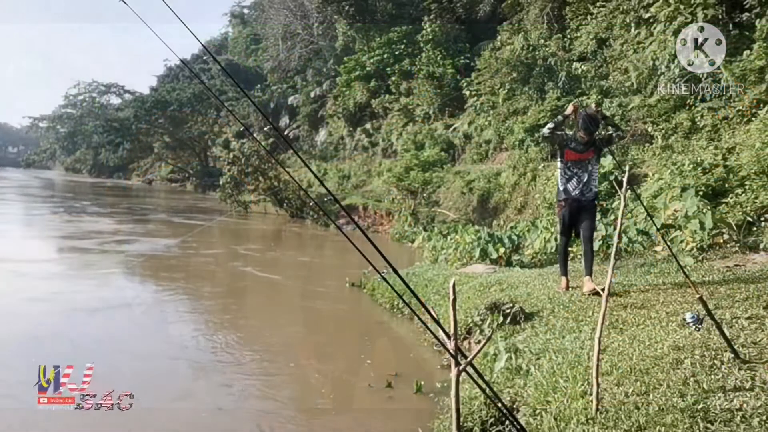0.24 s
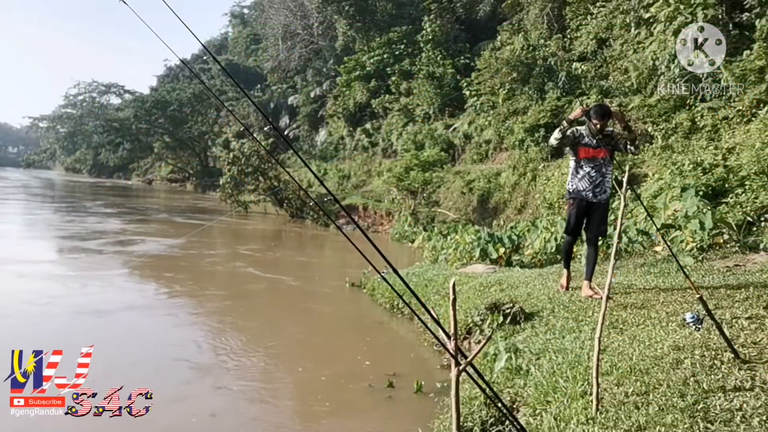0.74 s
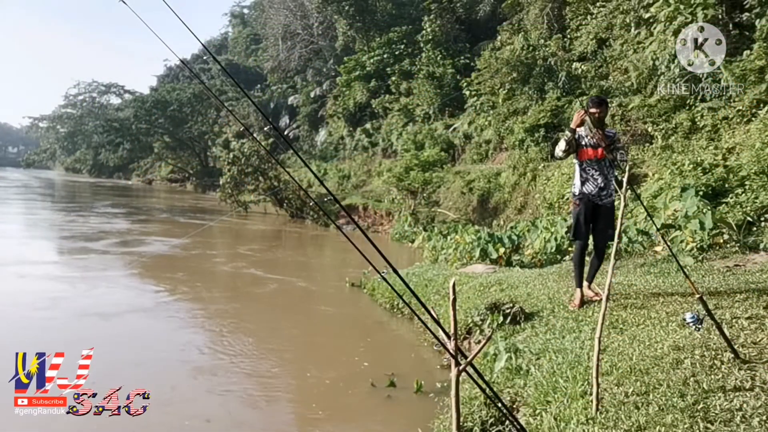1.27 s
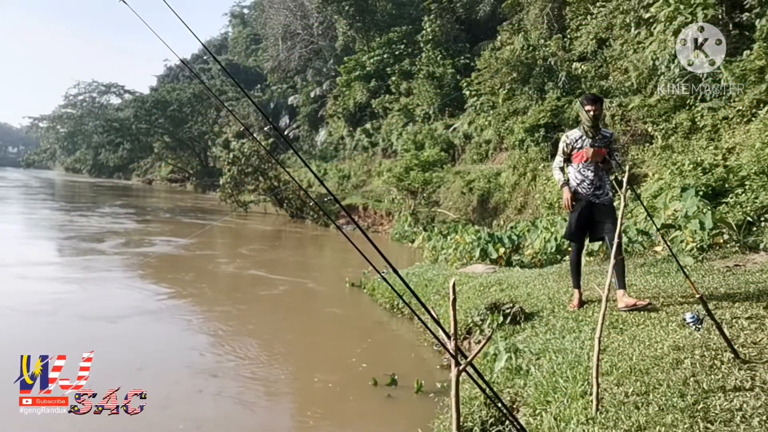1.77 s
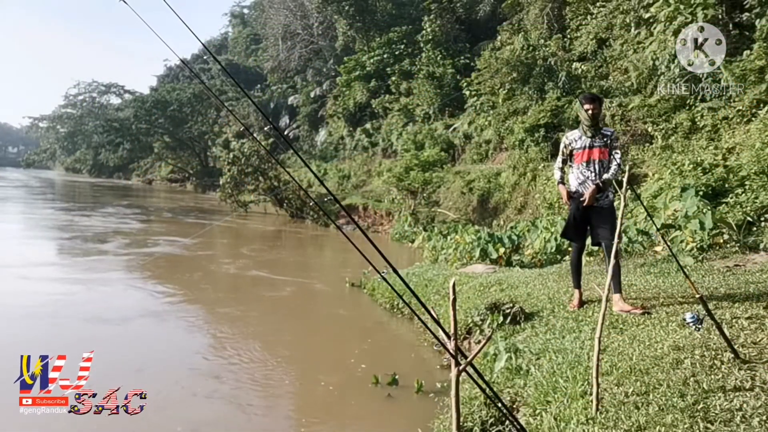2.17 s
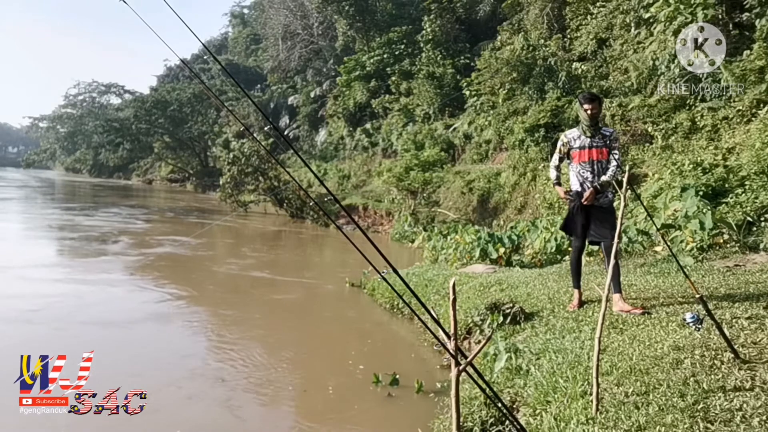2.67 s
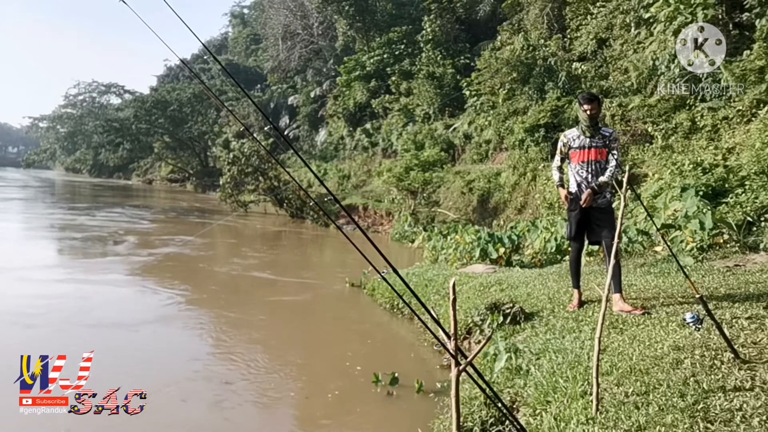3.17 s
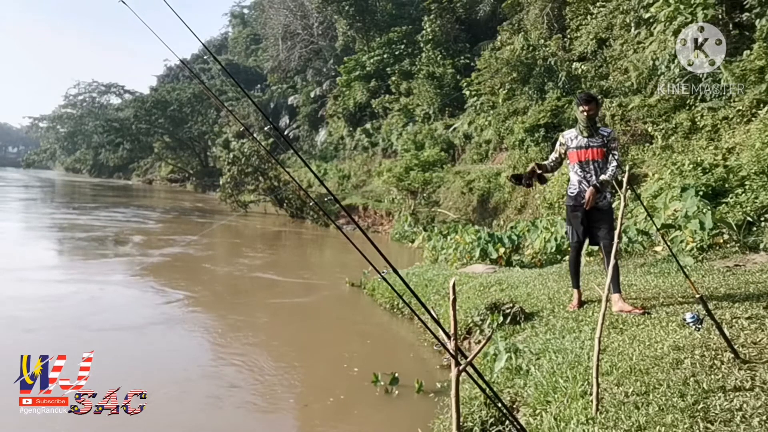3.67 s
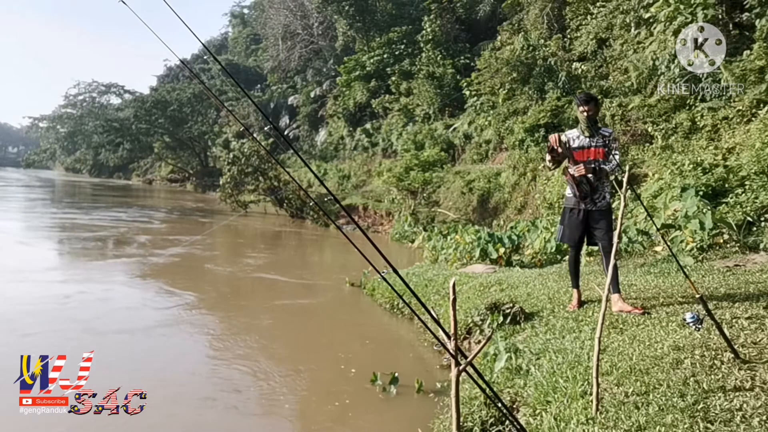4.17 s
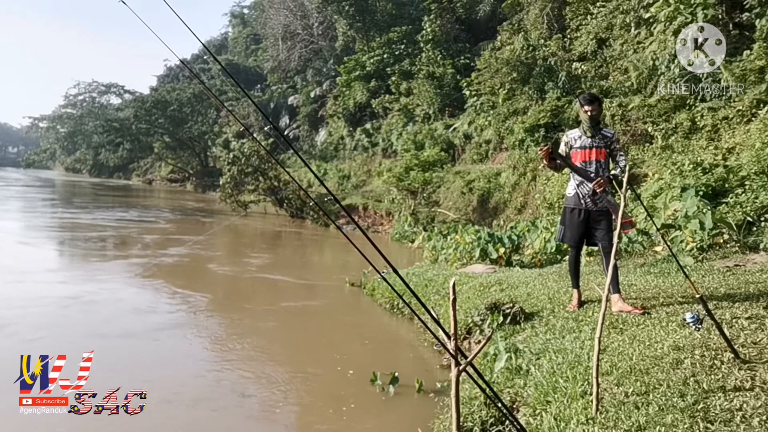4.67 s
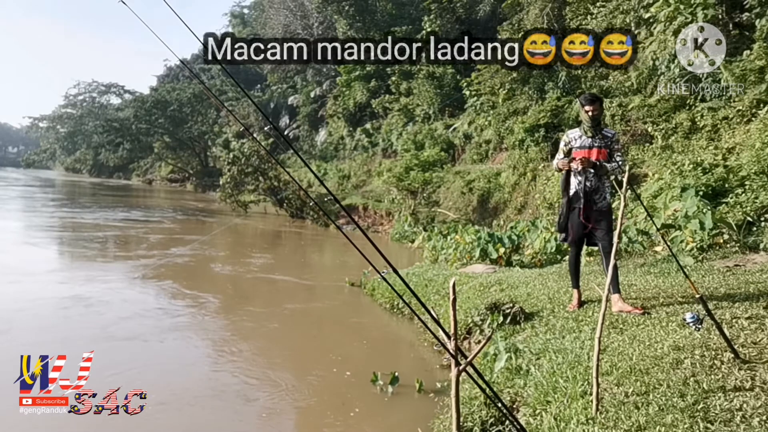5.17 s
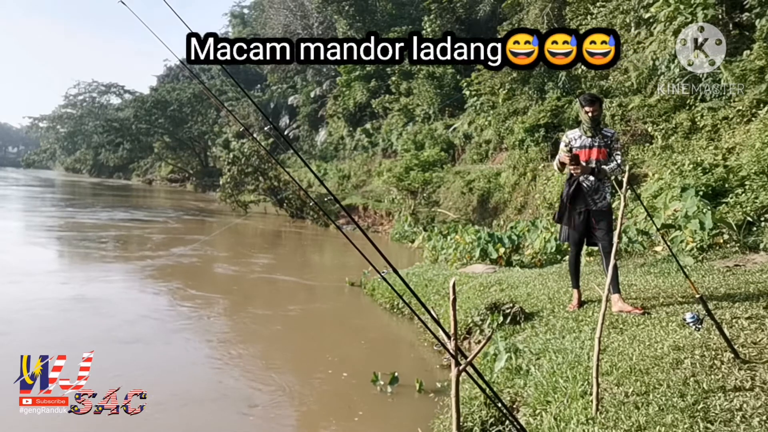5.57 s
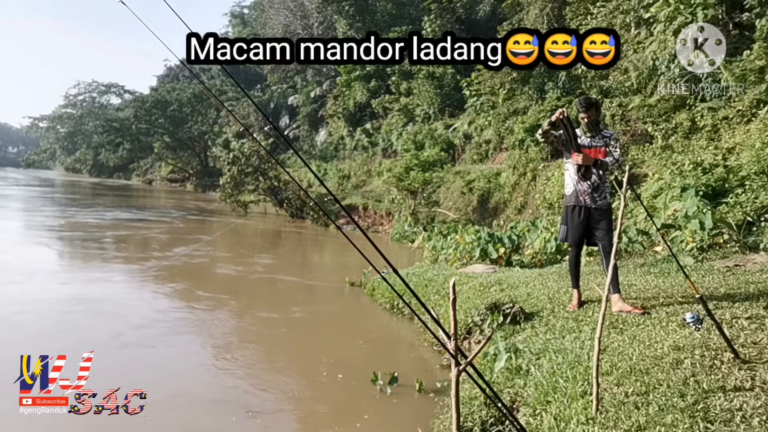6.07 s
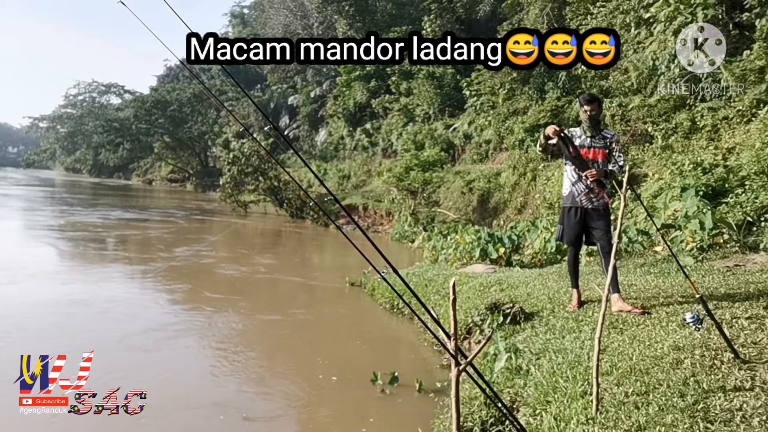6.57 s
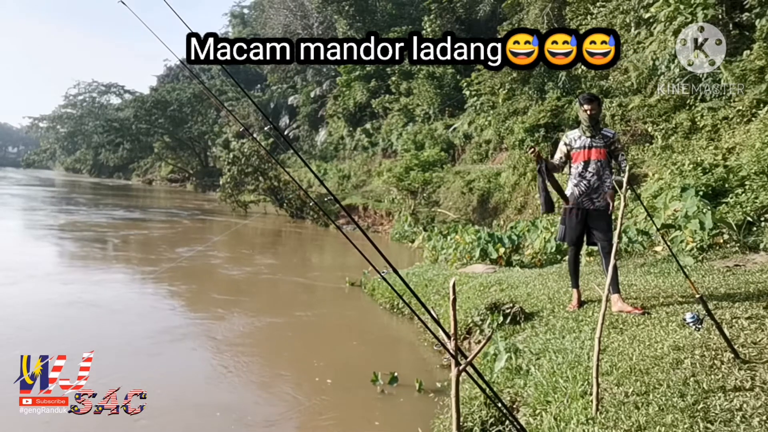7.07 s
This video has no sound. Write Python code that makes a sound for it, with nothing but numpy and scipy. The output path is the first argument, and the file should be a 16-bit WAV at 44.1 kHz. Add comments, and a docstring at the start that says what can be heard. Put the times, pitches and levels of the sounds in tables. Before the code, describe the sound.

From 0 to 7.3 s, a dense cicada chorus drones around 6 to 9 kHz, bright and flickering, starting softer and rising over the first 0.6 s, stronger on the right. Crisp cricket ticks recur roughly four times per second, with occasional gaps, alongside raspy high chirps, a wavering purr near 4.6 kHz and short rising trills about once a second. Lower answering chirps appear between 1.3 and 2.8 s. Underneath lie even river wash with a slight swell near 1.3 s, low air rumble and a distant unsteady engine, booming most from 2.6 to 5 s. Faint rustles and a hollow drone pass; a tiny snap falls at 2.1 s. Far soft hoots cluster from 1.2 to 3.2 s, then become rare. Hoarse, falling bird chips run from 2.7 to 3.5 s and from 6.6 to 7.2 s, lightly echoed by bank and trees.

```python
"""A cicada chorus drones high in the trees of a wooded bank: shaped noise, ringing singers and one clicking tymbal.
Crickets tick, chirp, trill and purr: noise resonances or gliding sines, shaped by wing strokes.
Below runs a muddy river of coloured noise; a far engine of wavering speed is a sum of its low orders.
A faint hollow drone, rustles and a thin whine lie between; one bird hoots far off, another gives two runs of chips.
The cicadas, most crickets and the even wash of the water start softer and rise over the first 0.6 s."""
import sys
import numpy as np
from scipy import signal
from scipy.fft import rfft, irfft, next_fast_len
from scipy.io import wavfile

SR = 44100
rng = np.random.default_rng(int(sys.argv[2]) if len(sys.argv) > 2 else 0)


def transcribe(signal):
    """Save signal, clipped to [-1, 1], as a 16-bit WAV file at the path in sys.argv[1]."""
    frames = np.atleast_2d(signal).T
    limited = np.clip(frames, -1, 1)
    pcm = np.round(limited * 32767).astype(np.int16)
    wavfile.write(sys.argv[1], SR, pcm)


N = 322812
TIME = np.arange(N) / SR

# Table levels stand before the gains in the functions; spectra are relative.
# Opening rise, held at its end. Each row: time in seconds, gain in dB.
FADE_IN = [(0, -15), (.2, -14.5), (.4, -11.5), (.6, -9.5)]

# Cicada chorus spectrum. Each row: frequency in Hz, left density in dB per Hz, right density in dB per Hz.
CHORUS_SPECTRUM = [(5480, -38, -29), (5624, -26.5, -20), (5937, -9.5, -10), (6030, -4.5, -14),
                   (6280, -3.5, -0.5), (7030, -2.5, 0.5), (7810, -1.5, -4), (8020, -7, -24), (8600, -9, -9),
                   (8810, -10.5, -24), (9170, -14.5, -20), (10950, -27.5, -26.5), (10900, -82, -78.5),
                   (13200, -34, -25), (15000, -44, -42)]
# Steady cicadas. Each row: pitch in Hz, width in Hz, level in dB, left minus right in dB.
STEADY_CICADAS = [(6560, 30, -79, 16), (7800, 170, -62.5, 4), (7864, 120, -53.5, -11.5),
                  (8030, 120, -67.5, -32)]
# Far cicada phrases. Each row: middle in seconds, length in seconds, pitch in Hz, level in dB,
# left minus right in dB.
CICADA_PHRASES = [(.52,0.65,6430,-69,-12),(1.52,0.51,6300,-61,-14),(2.55,.6,6300,-69,-9),(3.6,.6,6500,-62,-22),(4.65,0.49,6600,-64,-16),(5.678,0.66,6280,-63,-22),(6.652,0.7,6350,-65,-19),(1.05,1.1,8950,-65,-1),(3.95,1.1,8800,-86,8),(7,1.3,8950,-65,6)]

# Air rumble spectrum. Each row: frequency in Hz, density in dB per Hz.
RUMBLE_SPECTRUM = [(20, -23), (45, -3.5), (65, -14), (100, 0.5), (140, -1.5), (200, -14.5), (280, -21.5),
                   (450, -35.5)]
# Air rumble strength. Each row: time in seconds, level in dB.
RUMBLE_LEVELS = [(0, -62.5), (.42, -57.5), (.6, -55), (1.3, -52.5), (2.2, -53), (2.8, -56), (4.4, -54.5),
                 (5.5, -56.5), (6.2, -54.5), (7.32, -57)]
# Even river wash. Each row: frequency in Hz, density in dB per Hz.
WASH_SPECTRUM = [(150, -7), (300, 1.5), (500, -1), (800, -3.5), (1300, -5), (2500, -4.5), (3700, -5),
                 (5500, -6), (10000, -32), (15000, -33)]
# Water swells. Each row: time in seconds, level in dB.
SWELL_LEVELS = [(0, -75.5), (.7, -70.5), (1.1, -70.5), (1.25, -66), (1.62, -70), (1.85, -68.5),
                (2.5, -69.5), (3.0, -70.5), (5.3, -71.5), (6.3, -70), (7.32, -72.5)]
# Colour of the swells. Each row: frequency in Hz, density in dB per Hz.
SWELL_SPECTRUM = [(200, -7.5), (400, -4), (550, -4), (800, -7), (1300, -9), (2200, -9.5), (4000, -19)]

# Engine speed. Each row: time in seconds, rate in firings per second.
ENGINE_RATE = [(0, 43.5), (.24, 40.9), (.49, 43), (.85, 43), (1.1, 44.3), (1.24, 44.8), (1.37, 47.5),
               (1.77, 40.1), (1.98, 45), (2.2, 41.5), (2.44, 41.5), (2.63, 38.4), (2.91, 41), (3.3, 39.8),
               (3.65, 42.2), (3.83, 38.8), (4.04, 41.9), (4.36, 36.7), (4.59, 41), (4.89, 42.1),
               (5.12, 39.4), (5.32, 41.2), (5.57, 40.5), (5.91, 42.7), (6.14, 41.6), (6.34, 41.9),
               (6.46, 40.3), (6.81, 38.8), (7.16, 42), (7.32, 41)]
# Engine orders between surges. Each row: time in seconds, then levels of orders 2, 3, 4 and 5 in dB.
ENGINE_ORDERS = [(0, -59, -58, -70, -80), (.14, -66, -63, -72, -82), (.28, -66, -53, -68, -80),
                 (.44, -56, -59, -68, -76), (.5, -59, -45.3, -65, -68), (1.05, -49, -45, -66, -66),
                 (1.38, -49, -50, -70, -76), (1.55, -58, -51, -65, -74), (2.05, -54, -52, -64, -70),
                 (2.3, -52, -51, -64, -75), (2.6, -60, -51, -61, -76), (2.85, -52, -56, -54.5, -68),
                 (3.35, -48.5, -53, -52.5, -67), (3.6, -52.5, -55.5, -58, -72), (3.87, -52, -52, -54, -69),
                 (4.05, -50.5, -49, -59, -68), (4.2, -60, -56, -62, -74), (4.55, -53, -56, -56, -70),
                 (4.9, -54.5, -56, -60, -69), (5.1, -58, -54, -59, -70), (5.35, -51, -54, -65, -74),
                 (5.85, -51.5, -47, -59, -70), (6.3, -50, -47.5, -63, -75), (6.5, -56, -56, -55.5, -66),
                 (6.85, -52, -55, -58, -74), (7.1, -53, -49, -61, -68), (7.32, -50, -50, -63, -74)]
# Weak engine orders. Each row: multiple of the firing rate, level relative to order 4 in dB.
WEAK_ENGINE_ORDERS = [(1, -18.5), (6, -22.5)]
# Exhaust booms on order 3. Each row: middle in seconds, length in seconds, level in dB.
EXHAUST_SURGES = [(1.79, 0.16, -49.5), (1.977, 0.26, -61), (2.662, 0.25, -42), (2.818, 0.27, -41.5),
                  (3.176, 0.23, -39.5), (3.336, 0.21, -44), (3.64, .11, -45), (3.842, 0.17, -42),
                  (4.381, 0.35, -40), (4.916, 0.14, -43), (5.114, .22, -51)]

# Purring cricket. Each row: time in seconds, level in dB.
PURR_LEVELS = [(0, -80), (.5, -68.5), (.8, -68.5), (.92, -75), (1.7, -72.5), (2.0, -69), (2.4, -67),
               (2.9, -70.5), (3.2, -67.5), (3.7, -80), (4.7, -68), (5.7, -76.5), (6.65, -69), (7.32, -90)]
PURR_HZ, PURR_SCATTER_HZ, PURR_SPREAD_DB = 4657, 18, 1.6
PURR_STROKES_PER_S, PURR_STROKE_S, PURR_JITTER_S = 26, .024, .0045

# Insect whine. Each row: time in seconds, pitch in Hz, level in dB.
WHINE_TRACK = [(.1, 3070, -95), (.7, 3075, -85), (.9, 3072, -84), (1.25, 3060, -80), (1.7, 3060, -83),
               (1.95, 3055, -98), (3.3, 3000, -90), (3.8, 3000, -81), (4.3, 3020, -86), (4.8, 3042, -79),
               (5.05, 3050, -87), (5.9, 3020, -85), (6.4, 3030, -82), (7.3, 3040, -81)]
# Hollow drone. Each row: time in seconds, level in dB.
DRONE_LEVELS = [(1.0, -89), (1.3, -71), (2.0, -78), (2.4, -70.5), (3.2, -82), (3.7, -84.5), (5.8, -96),
                (6.3, -75), (6.6, -100)]
# Drone resonances. Each row: frequency in Hz, width in Hz, level in dB.
DRONE_MODES = [(375.5, 38, -1.5), (500, 160, -1)]

# High cricket runs. Each row: first chirp in seconds, last chirp in seconds, level in dB.
HIGH_CHIRP_RUNS = [(.03, .03, -57), (.43, .43, -56), (1.03, 1.25, -60), (1.49, 2.45, -57),
                   (2.69, 3.2, -56.5), (3.9, 4.13, -60.5), (4.37, 5.29, -56.5), (6.4, 6.63, -62),
                   (6.85, 7.29, -58.5)]
CHIRP_GAP_S, CHIRP_SPREAD_DB = .237, .7
# Nearest cricket ticks. Each row: middle in seconds, level in dB.
NEAR_TICKS = [(.13,-34),(0.55,-34),(.783,-35.5),(1.012,-37),(1.259,-38),(1.505,-34),(1.799,-36.5),(2.04,-35),(2.258,-36),(2.488,-39),(2.681,-34.5),(2.865,-35.5),(3.095,-33.5),(3.338,-33),(3.609,-39),(3.8,-34),(4.011,-36),(4.526,-44),(4.76,-34.5),(5.003,-37),(5.205,-36),(5.406,-33.5),(5.631,-34.5),(6.104,-39),(6.303,-35.5),(6.5,-36.5),(6.714,-34),(6.933,-36)]
TICK_HALF_LENGTH_S = .006  # falls to 1/e here
# Rustles and a snap. Each row: middle in seconds, length in seconds, centre in Hz, width in Hz, level in dB.
RUSTLE_EVENTS = [(.62, 0.49, 3730, 1800, -76.5), (1.27, 0.26, 1900, 1500, -74),
                 (1.302, 0.27, 700, 500, -73), (1.576, 0.29, 730, 380, -70.5),
                 (2.14, 0.027, 1400, 703, -65), (2.3, 0.17, 3800, 900, -77), (3.545, .08, 2680, 600, -72),
                 (4.764, 0.37, 3350, 2200, -72), (4.84, 0.14, 3460, 650, -67.5)]

# Short rapid trills. Each row: end in seconds, length in seconds, level in dB.
SHORT_TRILLS = [(0.922, .25, -70), (1.705, 0.24, -70), (2.436, 0.21, -67.5), (3.18, .19, -68),
                (4.0, .2, -70.5), (5.208, 0.45, -70.5), (6.31, 0.27, -68.5), (7.178, .28, -69)]
# Higher trills of another cricket. Each row: middle in seconds, length in seconds, pitch in Hz,
# rise in Hz per second, level in dB.
HIGHER_TRILLS = [(2.94, .11, 5320, 1400, -73), (4.14, .42, 5240, 803, -78.5)]
TRILL_STROKES_PER_S, TRILL_SHARPNESS, TRILL_SCATTER_HZ = 75, 1.5, 185
TRILL_HZ, TRILL_RISE_HZ_PER_S, TRILL_STOP_S = 5020, 800, 0.04  # pitch is that of the end

# Lower answering cricket. Each row: middle in seconds, level in dB.
ANSWERING_CHIRPS = [(1.33, -62), (1.5, -59), (1.66, -59), (1.86, -58), (2.07, -58.5), (2.29, -58.5),
                    (2.52, -57.5), (2.73, -57)]
# Far bird hoots. Each row: middle in seconds, length in seconds, pitch in Hz, level in dB.
FAR_HOOTS = [(1.18, 0.044, 454, -59), (1.394, 0.091, 416, -61), (1.57, 0.07, 405, -65),
             (1.785, 0.056, 392, -61), (1.868, 0.053, 395, -58), (1.965, 0.075, 395, -57.5),
             (2.145, 0.1, 392, -60), (2.384, 0.098, 392, -59), (2.61, 0.083, 396, -64),
             (2.862, 0.12, 387.6, -67.5), (2.972, 0.081, 376, -68), (3.191, 0.071, 390, -65.5),
             (4.361, 0.053, 403, -64.5), (5.975, 0.08, 431, -64)]
HOOT_SAG_HZ_PER_S = 83

# Bird chips. Each row: middle in seconds, level in dB, top pitch in Hz, lowest pitch in Hz,
# rise of the closing hook in Hz, gain of the hook in dB, length ratio.
BIRD_CHIPS = [(2.660, -59.5, 2650, 1850, 60, 2, 1), (2.932, -54, 2650, 2000, 60, -3, 1.15),
              (3.063, -50.5, 2860, 1880, 280, 1, .95), (3.183, -52, 2900, 1820, 480, -1, 1.1),
              (3.319, -51.5, 2800, 1880, 250, 0, .95), (3.447, -50, 2920, 1920, 400, -3, 1),
              (6.58, -57.5, 2750, 2000, 0, -4, 1.15), (6.910, -57.5, 2650, 1850, 100, 2, 1.2),
              (7.062, -52, 2620, 1880, 60, -1, .85), (7.205, -52, 2680, 1900, 100, -4, 1.1)]
# Shape of one chip. Each row: time from its middle in seconds, height from lowest to top pitch (0-1),
# share of the hook (0-1), gain in dB, hoarseness as a share of the pitch.
CHIP_CURVES = [(-.03, .6, 0, -30, .05), (-.019, .72, 0, -9, .07), (-.013, .85, 0, -1.5, .085),
               (-.008, .9, 0, 0, .07), (-.003, .66, 0, 1, .035), (.001, .46, 0, 3, .028),
               (.007, .16, 0, -4, .035), (.014, .04, 0, -3, .03), (.022, .05, .55, -5, .04),
               (.028, .05, 1, -9, .04), (.036, .05, 1, -32, .05)]
# Chip throat resonances. Each row: frequency in Hz, width in Hz, gain in dB.
THROAT_MODES = [(2330, 1300, 0), (2820, 70, -4)]
WARBLE_PER_S = 190
BANK_ECHO_S, BANK_ECHO_DB = .026, -7.5

CUTOFF_HZ = 15200


def from_db(db):
    """Decibels to gain."""
    return 10 ** (np.asarray(db) / 20)


def rms_one(x):
    """Scale to rms 1."""
    return x / np.sqrt(np.mean(x ** 2) + 1e-20)


def in_time(rows):
    """List of a table's columns, each interpolated at every sample."""
    s, *columns = np.transpose(rows)
    return [np.interp(TIME, s, column) for column in columns]


def drift(rate_hz):
    """Random wander of rms 1: noise through a double pole, computed every 40 samples."""
    step = 40
    pole = np.exp(-2 * np.pi * rate_hz * step / SR)
    noise = rng.standard_normal(N // step + 2002)
    slow = signal.lfilter([1], [1, -2 * pole, pole * pole], noise)[2000:]  # settled part
    return np.interp(np.arange(N) / step, np.arange(len(slow)), rms_one(slow))


def coloured(points, column=1):
    """Noise of rms 1 with the given spectrum, falling away past its ends."""
    table, size = np.array(points), next_fast_len(N)
    hz = np.maximum(np.fft.rfftfreq(size, 1 / SR), 1)
    gain = from_db(np.interp(np.log(hz), np.log(table[:, 0]), table[:, column]))
    gain *= np.minimum(1, np.minimum(hz / table[0, 0], table[-1, 0] / hz)) ** 2
    spectrum = rfft(rng.standard_normal(size)) * gain
    return rms_one(irfft(spectrum, size)[:N])


def band(x, hz, width_hz):
    """A resonance with steep skirts; gain 1 on top."""
    edges_hz = [hz - width_hz / 2, hz + width_hz / 2]
    sos = signal.butter(2, edges_hz, "band", fs=SR, output="sos")
    return signal.sosfilt(sos, x + 1e-18)


def resonate(x, hz, width_hz):
    """What rings in one resonance; rms 1."""
    return rms_one(band(x, hz, width_hz))


def narrow(hz, width_hz):
    """Many small impulses (noise) ringing in one resonance; rms 1."""
    return resonate(rng.standard_normal(N), hz, width_hz)


def cycles(hz):
    """Running phase of a moving frequency, in radians."""
    return 2 * np.pi * np.cumsum(hz * np.ones(N)) / SR


def bump(s, length_s):
    """A rounded swell of height 1 centred on s."""
    return np.maximum(1 - (2 * (TIME - s) / length_s) ** 2, 0)


def strokes(per_s, sharpness):
    """One rounded pulse per wing stroke; rms 1."""
    return rms_one(np.exp(sharpness * np.cos(cycles(per_s))))


def place(x, pan_db, lag_ms):
    """Stereo: the left side is louder by pan_db and earlier by lag_ms."""
    right = np.interp(TIME - lag_ms / 1000, TIME, x)
    return np.array([x * from_db(pan_db / 2), right * from_db(-pan_db / 2)])


def spread(points, alike, lag_ms):
    """Stereo noise; the power share alike on both sides reaches the left first."""
    shared = place(coloured(points), 0, lag_ms)
    separate = np.array([coloured(points), coloured(points)])
    return np.sqrt(alike) * shared + np.sqrt(1 - alike) * separate


def foliage(x, wet_db, t60_s):
    """Leaves and trunks scatter a dying cloud of small echoes, different on each side."""
    age = np.arange(SR) / SR
    cloud = rng.standard_normal((2, SR)) * from_db(-60 * age / t60_s) * (age > .006)
    cloud /= np.sqrt(np.sum(cloud ** 2, axis=1, keepdims=True))
    return x + from_db(wet_db) * signal.fftconvolve(x, cloud, axes=1)[:, :N]


def cicada_chorus():
    """Many cicadas merge into flickering shaped noise, with one nearer tree as a broad resonance."""
    flicker_db = 1.0 * drift(220) + 0.25 * drift(6.0)
    left = from_db(-42.5 + flicker_db) * coloured(CHORUS_SPECTRUM, column=1)
    right = from_db(-41.0 + flicker_db) * coloured(CHORUS_SPECTRUM, column=2)
    tree = from_db(-48.5 + flicker_db) * narrow(hz=7470, width_hz=800)
    return np.array([left, right]) + place(tree, pan_db=-10.5, lag_ms=0.397)


def steady_cicadas():
    """Single cicadas hold steady notes: noise in narrow resonances."""
    return sum(place(from_db(db) * narrow(hz, width_hz), pan_db, lag_ms=0.372)
               for hz, width_hz, db, pan_db in STEADY_CICADAS)


def clicking_cicada():
    """One near tymbal clicks at an almost even rate and rings a resonance."""
    clicks_per_s = 108 * (1 + 0.0045 * drift(3))
    clicks = np.diff(np.floor(cycles(clicks_per_s) / (2 * np.pi)), prepend=0)
    uneven = clicks * from_db(2.1 * drift(65))
    buzz = from_db(-55.0) * resonate(uneven, hz=7600, width_hz=190)
    return place(buzz, pan_db=-29.0, lag_ms=0.3886)


def air_rumble():
    """Low rumble of the air: noise of wandering level, mostly alike on both sides."""
    level = from_db(in_time(RUMBLE_LEVELS)[0] + 1.33 * drift(3.7))
    return level * spread(RUMBLE_SPECTRUM, alike=0.82, lag_ms=0.076) * from_db([[.6], [-.6]])


def river():
    """Water as an even wash and slow swells of coloured noise, mostly different on each side."""
    fade_db, = in_time(FADE_IN)
    swell_db, = in_time(SWELL_LEVELS)
    wash_level = from_db(fade_db - 63.0 + .5 * drift(8.2))
    wash = wash_level * spread(WASH_SPECTRUM, alike=0.2, lag_ms=0.14)
    swell_level = from_db(swell_db + 3.0 + 1.8 * drift(13.7))
    swells = swell_level * spread(SWELL_SPECTRUM, alike=0.35, lag_ms=0.24)
    return (wash + swells) * from_db([[.6], [-.6]])


def engine():
    """Only the low orders carry this far; the air makes each flutter, and the exhaust booms in every surge."""
    turn = cycles(in_time(ENGINE_RATE)[0])
    boom = sum(from_db(db) * bump(s, length_s) for s, length_s, db in EXHAUST_SURGES)
    second, third, fourth, fifth = from_db(in_time(ENGINE_ORDERS))
    orders = [(2, second, 0), (3, third, boom), (4, fourth, 0), (5, fifth, 0)]
    orders += [(round(k), fourth * from_db(db), 0) for k, db in WEAK_ENGINE_ORDERS]
    hum = np.zeros(N)
    for k, steady, extra in orders:
        level = steady * from_db(1.83 * drift(14.0)) + extra
        hum += level * np.sin(k * turn + rng.uniform(0, 2 * np.pi))
    return place(from_db(2.5) * hum, pan_db=1.3, lag_ms=0.5)


def purr_haze():
    """Purring crickets farther off blur into noise in one resonance."""
    sides = np.array([narrow(hz=4594, width_hz=470) for side in range(2)])
    return from_db(-65.5 + in_time(FADE_IN)[0]) * sides


def purring_cricket():
    """One cricket purrs in separate wing strokes, uneven in timing, pitch and level."""
    out, beats = np.zeros(N), np.arange(0, N / SR, 1 / PURR_STROKES_PER_S)
    scrape = cycles(90 * drift(260))
    for s, (late, sharp, loud) in zip(beats, rng.standard_normal((len(beats), 3))):
        start = s + PURR_JITTER_S * late
        near = slice(*np.searchsorted(TIME, [start, start + PURR_STROKE_S]))
        age = TIME[near] - start
        swell = from_db(PURR_SPREAD_DB * loud) * np.sin(np.pi * age / PURR_STROKE_S) ** 2
        pitch_hz = PURR_HZ + PURR_SCATTER_HZ * sharp
        out[near] += swell * np.sin(2 * np.pi * pitch_hz * age + scrape[near])
    level = from_db(in_time(PURR_LEVELS)[0] - 5.0)
    return foliage(place(level * rms_one(out), pan_db=-4.5, lag_ms=.41), wet_db=0, t60_s=0.083)


def whine():
    """A far insect's faint, rasping note: a sine of scattered pitch that comes and goes."""
    hz, db = in_time(WHINE_TRACK)
    scatter_hz = 60 * drift(130)
    level = from_db(db + 2.8 + 2.0 * drift(25))
    return place(level * np.sin(cycles(hz + scatter_hz)), pan_db=-10.5, lag_ms=0.28)


def hollow_drone():
    """A far hollow drone: noise in low resonances, scattered by the foliage."""
    modes = sum(from_db(db) * narrow(hz, width_hz) for hz, width_hz, db in DRONE_MODES)
    drone = from_db(in_time(DRONE_LEVELS)[0]) * modes
    return foliage(place(drone, pan_db=4.0, lag_ms=0.21), wet_db=-1.5, t60_s=0.22)


def repeats(runs, gap_s, spread_db):
    """Evenly paced calls through each run, each a little louder or softer: (s, dB)."""
    calls = []
    for first_s, last_s, db in runs:
        count = round((last_s - first_s) / gap_s) + 1
        for s in np.linspace(first_s, last_s, count):
            calls.append((s, db + spread_db * rng.standard_normal()))
    return calls


def chirping_cricket():
    """Even, raspy chirps: noise in a broad resonance and a sharp wing resonance."""
    chirps = repeats(HIGH_CHIRP_RUNS, CHIRP_GAP_S, CHIRP_SPREAD_DB)
    level = sum(from_db(db - 0.7) * bump(s, length_s=0.19) for s, db in chirps)
    wing = from_db(-0.5) * narrow(hz=8680, width_hz=43) + from_db(1.0) * narrow(hz=8530, width_hz=300)
    return foliage(place(level * wing, pan_db=-11.5, lag_ms=.36), wet_db=-5.5, t60_s=0.17)


def ticking_cricket():
    """Single wing strokes, each a brief rising note."""
    out = np.zeros(N)
    for s, db in NEAR_TICKS:
        near = np.abs(TIME - s) < .04
        age = TIME[near] - s
        pitch_hz = 7330 + 20000 * age
        swell = from_db(db) * np.exp(-(age / TICK_HALF_LENGTH_S) ** 2)
        out[near] += swell * np.sin(2 * np.pi * np.cumsum(pitch_hz) / SR)
    return foliage(place(out, pan_db=-8.5, lag_ms=0.386), wet_db=-32, t60_s=0.081)


def phrasing_cicadas():
    """Far cicadas sing in phrases: narrow resonances that swell and fade."""
    return sum(place(from_db(db) * bump(s, length_s) * narrow(hz, width_hz=90), pan_db, lag_ms=0.375)
               for s, length_s, hz, db, pan_db in CICADA_PHRASES)


def rustles():
    """Near rustles and a snap: short noise swells in resonances, uneven in level."""
    events = sum(from_db(db) * bump(s, length_s) * narrow(hz, width_hz)
                 for s, length_s, hz, width_hz, db in RUSTLE_EVENTS)
    uneven = events * from_db(2.0 * drift(60))
    return foliage(place(uneven, pan_db=4.0, lag_ms=0.21), wet_db=-1.5, t60_s=0.22)


def trilling_crickets():
    """Short trills swell, climb and stop short, higher ones swell and fade; every third stroke is stronger."""
    notes, scatter_hz = np.zeros(N), TRILL_SCATTER_HZ * drift(248)
    for end, length_s, db in SHORT_TRILLS:
        swell = np.interp(TIME, [end - length_s, end - TRILL_STOP_S, end], [0, 1, 0])
        pitch_hz = TRILL_HZ + TRILL_RISE_HZ_PER_S * (TIME - end) + scatter_hz
        notes += from_db(db) * swell * np.sin(cycles(pitch_hz))
    for s, length_s, hz, rise_hz_per_s, db in HIGHER_TRILLS:
        pitch_hz = hz + rise_hz_per_s * (TIME - s) + .4 * scatter_hz
        notes += from_db(db) * bump(s, length_s) * np.sin(cycles(pitch_hz))
    per_s = TRILL_STROKES_PER_S * (1 + 0.0144 * drift(2.0))
    burst = notes * strokes(per_s, TRILL_SHARPNESS) * strokes(per_s / 3, sharpness=0.22)
    return foliage(place(from_db(3.0) * burst, pan_db=-7.0, lag_ms=0.37), wet_db=0, t60_s=0.098)


def answering_cricket():
    """A neighbour answers with lower, rising chirps: gliding sines of scattered pitch."""
    out = np.zeros(N)
    for s, db in ANSWERING_CHIRPS:
        pitch_hz = 8230 + 2000 * (TIME - s) + 80 * drift(150)
        out += from_db(db) * bump(s, length_s=0.35) * np.sin(cycles(pitch_hz))
    return foliage(place(out, pan_db=-11.5, lag_ms=.36), wet_db=-5.5, t60_s=0.17)


def hooting_bird():
    """Soft pure hoots, each a sine that sags a little in pitch."""
    notes = np.zeros(N)
    for s, length_s, hz, db in FAR_HOOTS:
        pitch_hz = hz - HOOT_SAG_HZ_PER_S * (TIME - s)
        notes += from_db(db - 0.5) * bump(s, length_s) * np.sin(cycles(pitch_hz))
    return foliage(place(notes, pan_db=2.0, lag_ms=.15), wet_db=-10, t60_s=.6)


def chipping_bird():
    """Hoarse, warbling chips fall in pitch, most hook up again; bank and trees throw them back."""
    ages, *curves = np.transpose(CHIP_CURVES)
    warble = np.sin(cycles(WARBLE_PER_S * (1 + .3 * drift(80)))) + .5 * narrow(hz=255, width_hz=280)
    out = np.zeros(N)
    for s, db, top_hz, low_hz, hook_hz, hook_db, stretch in BIRD_CHIPS:
        near = (TIME > s + stretch * ages[0]) & (TIME < s + stretch * ages[-1])
        age = (TIME[near] - s) / stretch
        height, hook, shape_db, hoarse = [np.interp(age, ages, curve) for curve in curves]
        smooth_hz = low_hz + height * (top_hz - low_hz) + hook * hook_hz
        pitch_hz = smooth_hz * (1 + hoarse * warble[near])
        tail = np.clip(age / .012, 0, 1)  # brings in the hook's gain
        level = from_db(db + shape_db + hook_db * tail)
        out[near] += level * np.sin(2 * np.pi * np.cumsum(pitch_hz) / SR)
    out *= from_db(-0.2 + 2.9 * drift(240))
    call = sum(from_db(db) * band(out, hz, width_hz) for hz, width_hz, db in THROAT_MODES)
    returned = band(call, hz=2770, width_hz=890)
    echo = from_db(BANK_ECHO_DB) * np.interp(TIME - BANK_ECHO_S, TIME, returned)
    bank = foliage(place(echo, pan_db=0.0, lag_ms=.3), wet_db=-9, t60_s=0.079)
    heard = place(call, pan_db=1.5, lag_ms=0.41) + bank
    return foliage(foliage(heard, wet_db=-6.0, t60_s=0.09), wet_db=-6.5, t60_s=1.0)


def scene():
    """Insects are mostly louder on the right; engine, drone, rustles and birds on the left."""
    fade_db, = in_time(FADE_IN)
    cicadas = cicada_chorus() + steady_cicadas() + clicking_cicada() + phrasing_cicadas()
    crickets = chirping_cricket() + ticking_cricket() + answering_cricket()
    insects = from_db(fade_db) * (cicadas + crickets)
    insects += purr_haze() + purring_cricket() + whine() + trilling_crickets()
    surroundings = air_rumble() + river() + engine() + hollow_drone() + rustles()
    return insects + surroundings + hooting_bird() + chipping_bird()


def record(dry):
    """A 5 ms ramp opens the sound; a steep low-pass cuts the top."""
    opening = np.minimum(TIME / .005, 1)
    lowpass = signal.ellip(10, .1, 80, CUTOFF_HZ, fs=SR, output="sos")
    return signal.sosfilt(lowpass, dry * opening)


dry = scene()
out = record(dry)
transcribe(out)
```